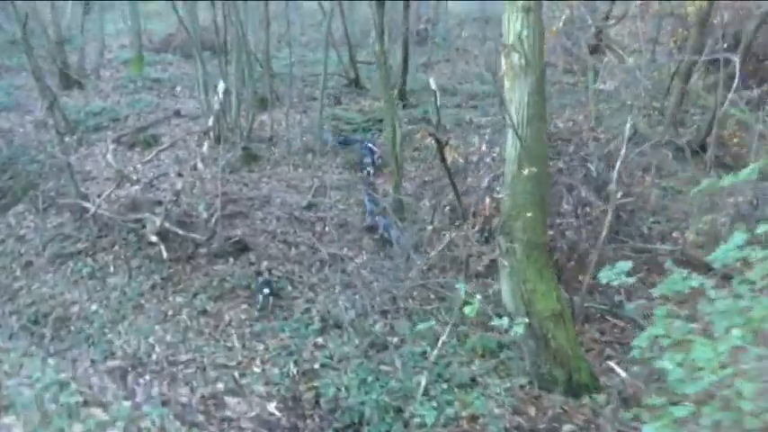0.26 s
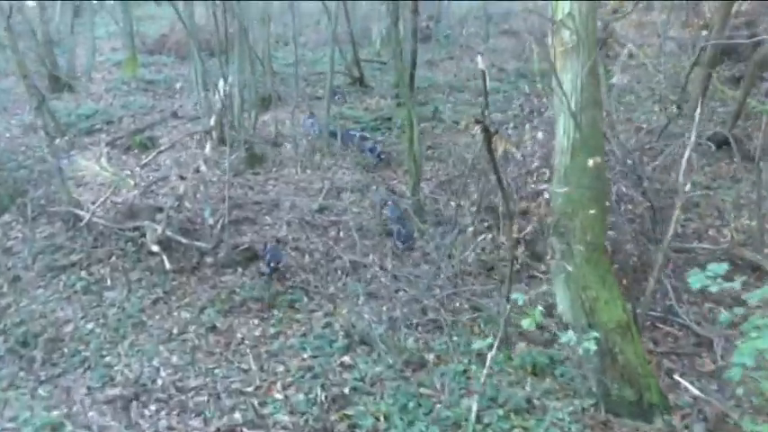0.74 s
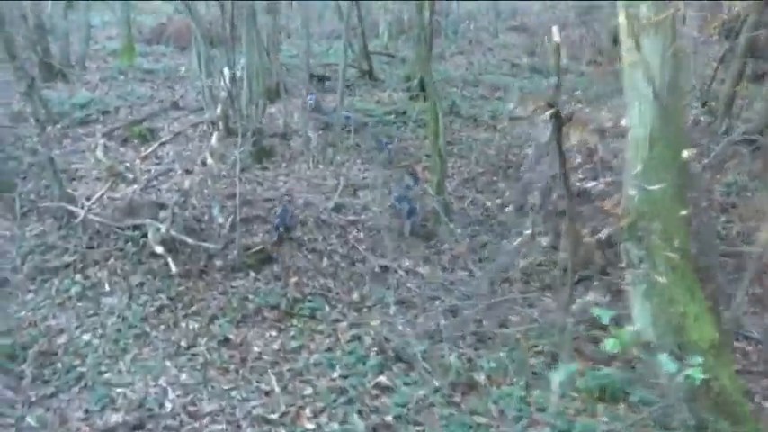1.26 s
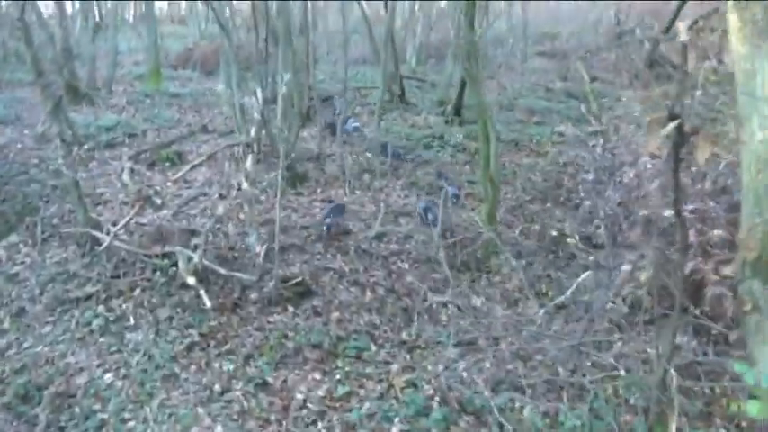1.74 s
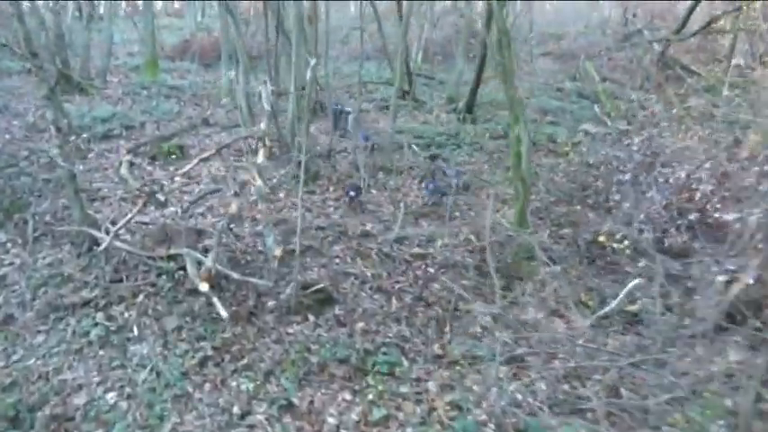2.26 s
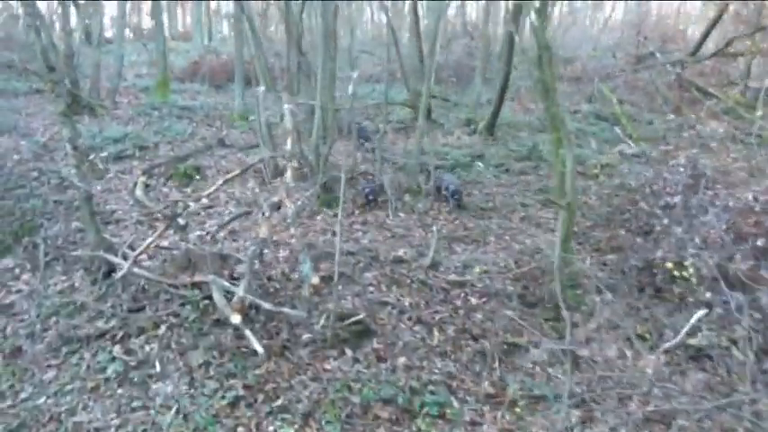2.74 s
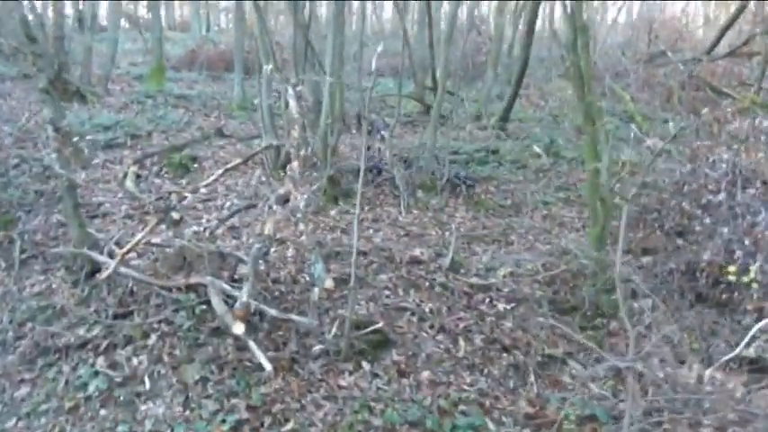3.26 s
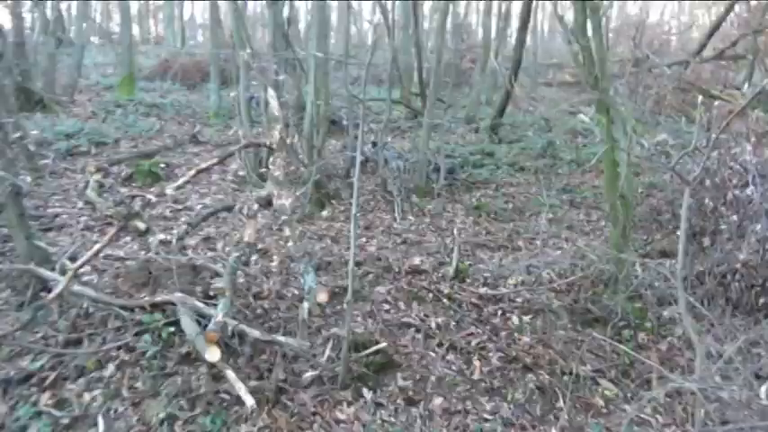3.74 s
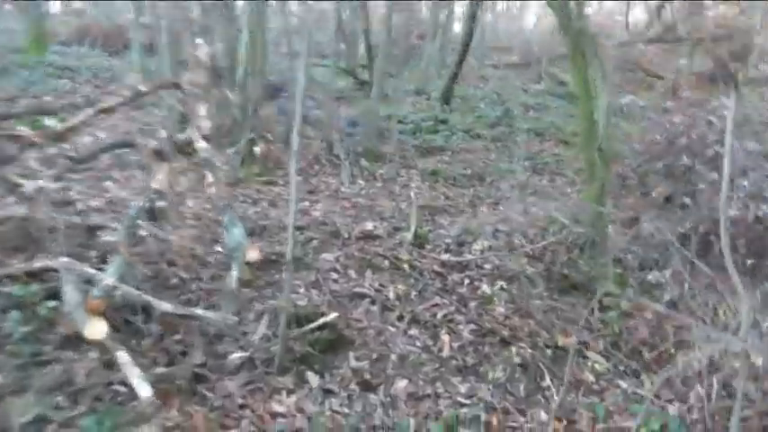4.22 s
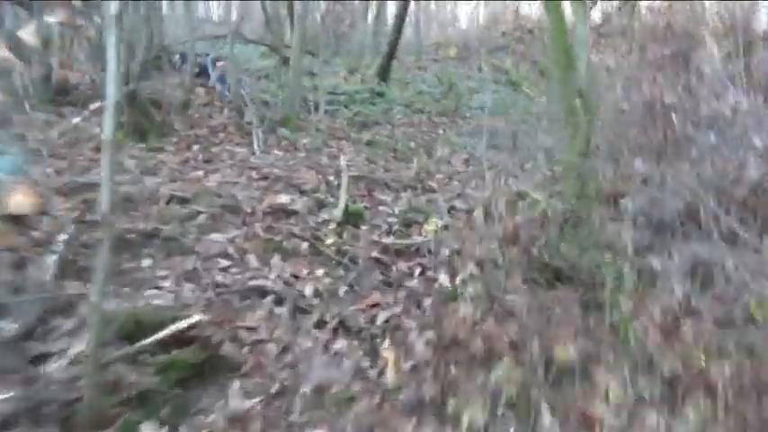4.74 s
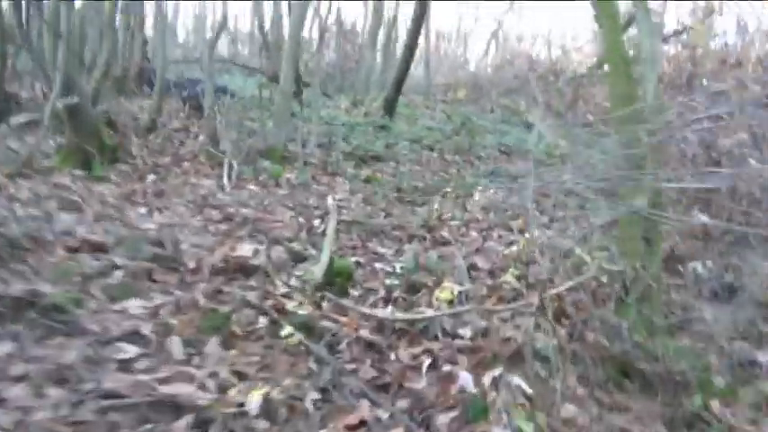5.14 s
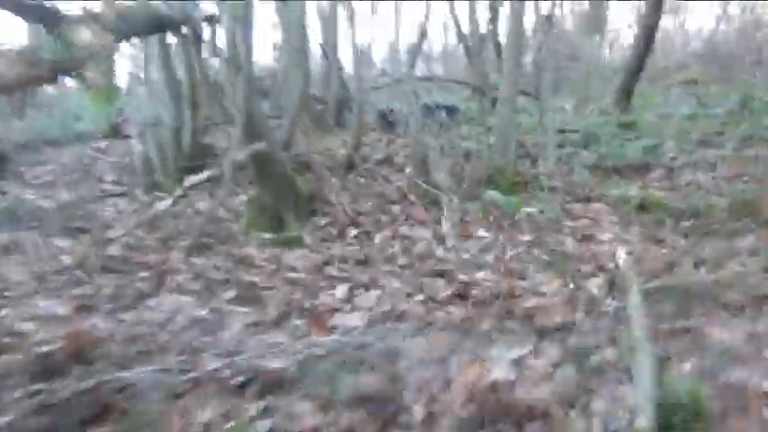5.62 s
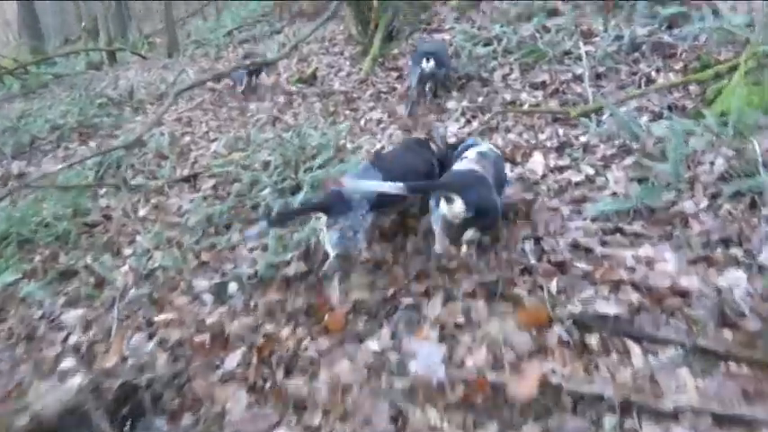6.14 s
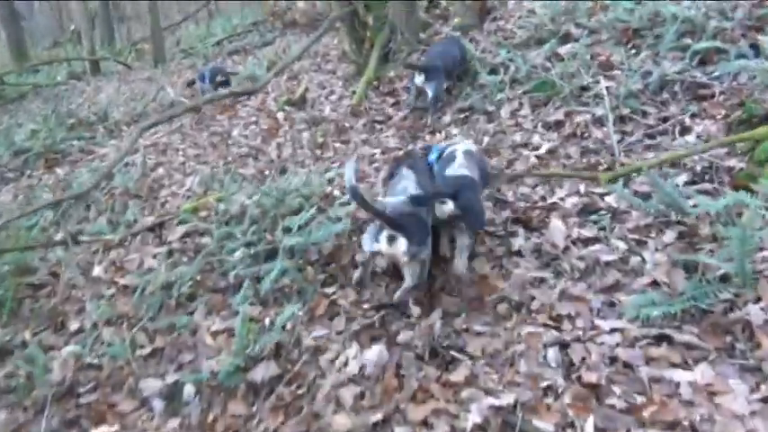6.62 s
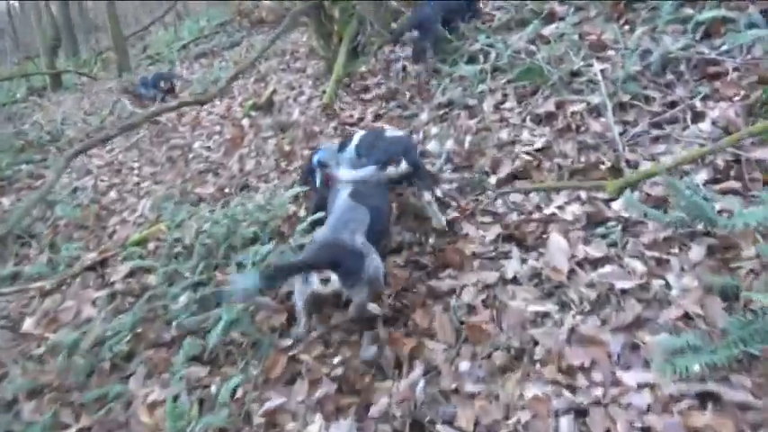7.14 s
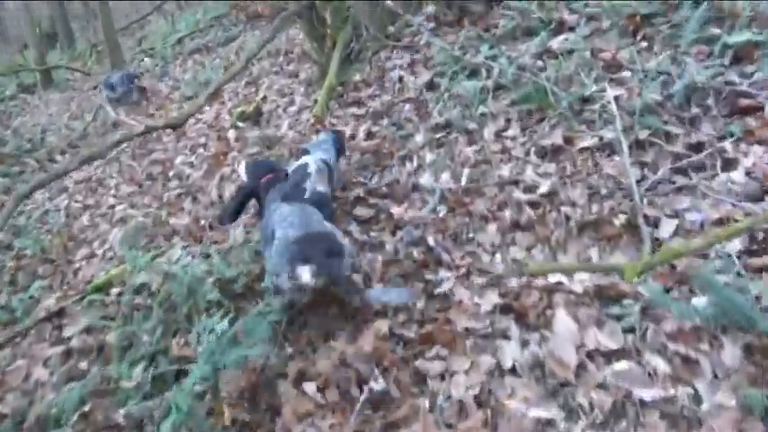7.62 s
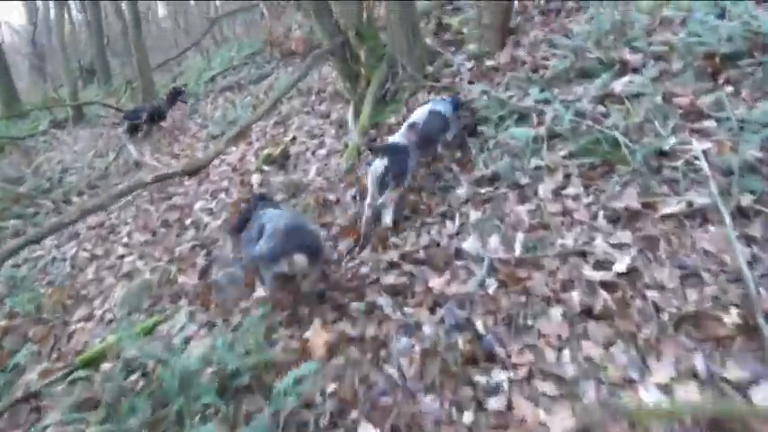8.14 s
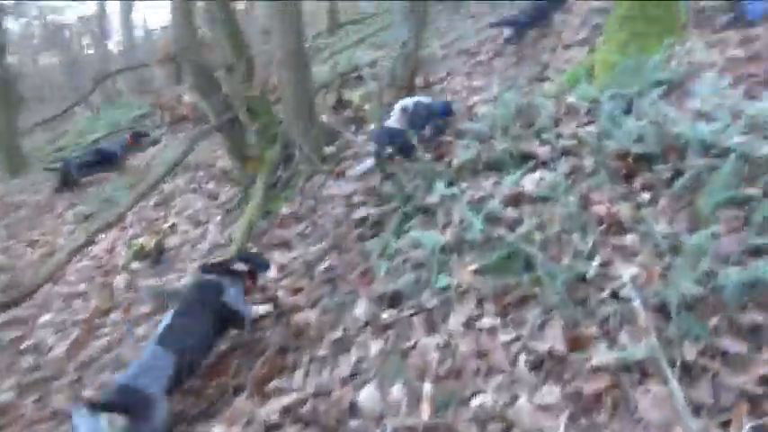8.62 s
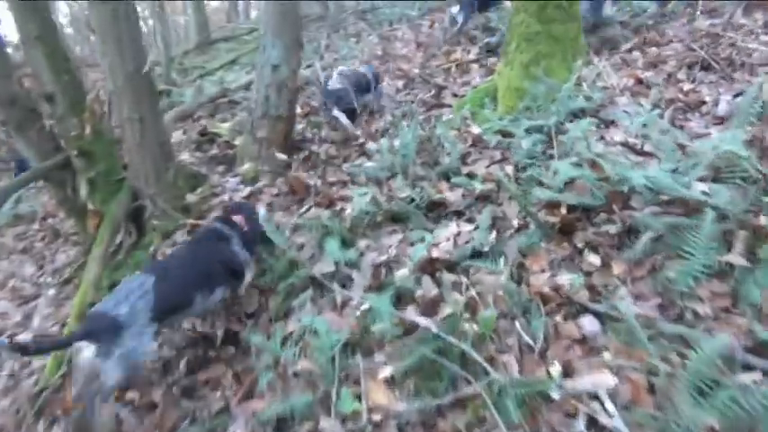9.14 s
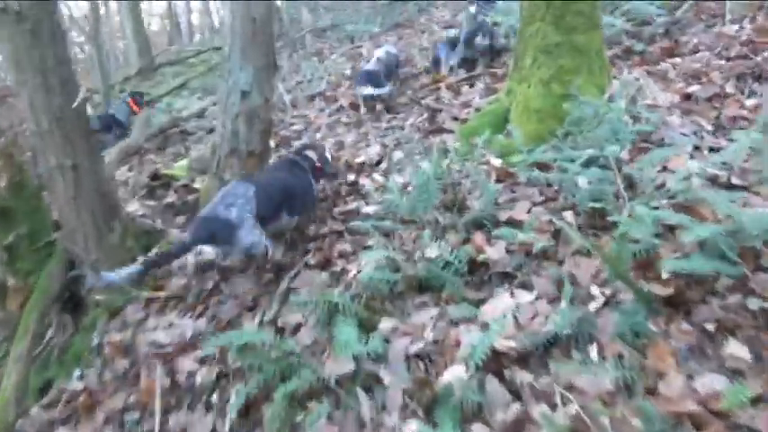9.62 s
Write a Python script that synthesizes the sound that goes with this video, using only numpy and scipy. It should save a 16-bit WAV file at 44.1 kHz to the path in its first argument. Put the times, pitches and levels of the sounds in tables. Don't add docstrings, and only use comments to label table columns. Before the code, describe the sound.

A pack of hounds bays in overlapping howls and hoarse barks in bare woodland, with crunching leaves, snapping twigs and faint collar bells.

```python
import sys
import numpy as np
from scipy import signal
from scipy.fft import rfft, irfft, next_fast_len
from scipy.io import wavfile
from scipy.ndimage import uniform_filter1d, minimum_filter1d, map_coordinates

SR = 44100
rng = np.random.default_rng(int(sys.argv[2]) if len(sys.argv) > 2 else 0)


def volts_from_db(level):
    exponent = np.asarray(level, float) / 20
    return 10 ** exponent


def master(y):
    cut = np.clip(np.atleast_2d(y).T, -1, 1)
    pcm = np.round(cut * 32767)
    wavfile.write(sys.argv[1], SR, pcm.astype(np.int16))


N = 435266
TIME = np.arange(N) / SR

# start [t/s], length [t/s], first pitch [f/Hz], last pitch [f/Hz], level [dB]
OPEN_BAYS = [(0.163, .11, 449, 472, -33.5), (0.196, 0.21, 388.4, 388.3, -23.5), (0.682, 0.2, 367, 349, -43),
             (0.969, 0.13, 357, 387.4, -30.5), (1.766, 0.061, 439, 441, -24.5),
             (2.878, 0.17, 461, 493, -32.5), (3.618, 0.18, 388, 377, -27), (3.811, 0.19, 450, 447, -34.5),
             (3.967, 0.084, 410, 416, -31), (4.42, 0.07, 385, 377, -30), (4.5, 0.36, 380, 359.7, -28),
             (7.296, 0.077, 375, 374, -22), (7.819, 0.046, 389, 372, -23.5), (7.927, 0.065, 395, 383, -25),
             (8.066, 0.11, 439, 454, -28.5), (9.091, .21, 495, 422, -31), (8.907, 0.175, 490, 537, -39),
             (8.68, 0.2, 470, 453, -32.5), (9.469, 0.094, 440, 507, -39), (9.621, 0.11, 500, 511.5, -40),
             (5.03, 0.026, 500, 484, -34), (7.662, 0.036, 505, 496, -26.5), (8.27, 0.11, 394, 393, -30),
             (0.431, 0.058, 384.4, 377, -28.5), (4.589, 0.053, 369, 377, -20.5)]
ROUND_BAYS = [(0, 0.22, 461.5, 419, -13), (0.399, 0.27, 396.3, 363, -26.5), (.95, 0.246, 470, 520, -28),
              (1.19, 0.096, 506.4, 463, -20.5), (1.912, .1, 633, 583, -21.5),
              (2.284, 0.26, 469, 459, -20.5), (3.378, 0.26, 424.2, 444.6, -18.5),
              (4.57, 0.11, 520.3, 521, -15.5), (4.68, 0.16, 515.5, 487, -20.5),
              (5.83, 0.059, 471.8, 470, -14), (7.366, 0.47, 408, 403.7, -13), (7.839, 0.15, 395, 399, -18),
              (7.99, 0.32, 404.3, 410, -13.5), (8.27, 0.091, 400, 391, -18.5),
              (8.345, 0.079, 421.3, 395, -16), (8.669, 0.15, 484.6, 429.8, -15),
              (8.721, 0.092, 460, 430, -14.5), (8.79, 0.166, 470, 490, -22.5),
              (9.553, 0.073, 426, 428, -18.5), (9.617, 0.15, 435, 399, -14.5),
              (9.65, 0.06, 470.4, 487, -14), (9.78, 0.15, 472, 455, -26)]
PURE_BAYS = [(.33, 0.19, 502.4, 501, -22), (.6, 0.17, 481, 486.7, -20.5), (.82, 0.24, 463, 470, -19.5),
             (1.522, 0.271, 442, 403, -18), (1.79, .12, 482, 502, -15.5), (2.04, 0.177, 470, 413, -18),
             (2.71, 0.267, 526, 482.5, -20.5), (2.951, 0.3156, 428, 494.4, -21),
             (3.26, 0.13, 485, 472, -16), (3.81, 0.16, 515.5, 503, -22.5),
             (3.926, 0.171, 434.4, 480.6, -23.5), (4.9, 0.137, 470, 489, -26), (5.0, 0.06, 518, 494.6, -17),
             (8.1, 0.098, 478, 534, -19), (8.682, 0.081, 383, 442, -17.5), (8.78, 0.127, 418, 404, -13.5),
             (8.876, 0.147, 402.3, 359.6, -21.5), (9.076, 0.098, 381, 403, -23.5),
             (9.317, 0.14, 417.4, 408.3, -9), (9.7, 0.037, 499, 506, -18), (.04, 0.036, 507, 528, -16),
             (.6, 0.021, 519, 522, -13), (9.198, 0.105, 435, 491, -12.5)]
HIGH_BAYS = [(1.101, 0.15, 594.5, 654, -18.5), (1.283, 0.061, 576, 570, -20), (1.378, .15, 658, 538, -14),
             (2.008, 0.14, 574.4, 559, -18), (2.227, 0.24, 517, 563, -17.5), (2.422, 0.118, 596, 585, -16),
             (2.555, 0.15, 591.4, 562.3, -10.5), (4.456, .12, 539.6, 603, -16),
             (4.399, 0.029, 461, 583, -27), (7.288, 0.01, 520, 564, -9), (7.524, .08, 720, 470, -18),
             (9.295, 0.04, 659, 705, -14), (9.48, 0.089, 512, 550, -24), (9.581, 0.06, 556, 467, -15.5),
             (8.724, 0.016, 616, 595, -24), (9.171, 0.023, 564, 520, -23)]
SHRILL_BAYS = [(0.191, .06, 1373, 1440, -30), (0.169, 0.074, 1790, 1900, -44.5),
               (0.362, 0.108, 1676, 1770, -34), (0.049, 0.028, 2020, 2080, -35),
               (0.861, 0.054, 1640, 1667, -24.5), (.97, 0.093, 1425, 1470, -37),
               (1.027, 0.092, 1240, 1223, -40), (1.339, 0.21, 1702, 1518, -30.5),
               (1.183, 0.039, 1650, 1677, -26), (1.92, 0.028, 1790, 1850, -27),
               (1.919, 0.027, 2030, 2020, -33), (1.93, .05, 850, 800, -21),
               (1.99, 0.072, 1715, 1660, -30.5), (2.092, .08, 1720, 1660, -31),
               (2.41, 0.061, 1080, 1194, -27), (2.42, 0.095, 1416, 1540, -31),
               (2.84, 0.054, 1390, 1390, -26), (3.201, 0.097, 1340, 1320, -33),
               (3.928, 0.091, 2000, 2150, -47), (3.44, 0.032, 640, 617, -19.5),
               (4.618, .045, 1330, 1350, -26), (4.69, .09, 1380, 1390, -31), (4.93, 0.098, 1130, 1207, -25),
               (7.519, 0.035, 1900, 1880, -31), (7.569, .035, 1790, 1750, -26),
               (7.67, 0.034, 1587, 1670, -32), (8.04, 0.019, 1750, 1770, -32),
               (8.064, 0.018, 2170, 2180, -30), (8.655, 0.024, 1457, 1430, -27),
               (8.782, .04, 1500, 1630, -25.5), (9.11, 0.056, 1500, 1460, -30),
               (9.211, 0.076, 1420, 1234, -35), (9.34, 0.074, 1150, 1170, -32.5),
               (9.36, 0.052, 2120, 2150, -42), (9.69, 0.1, 1497, 1510, -30),
               (5.898, 0.024, 1153, 1110, -26), (4.52, 0.068, 962, 900, -24)]
SECOND_PARTIAL_DB = [6, -13.5, -25, -18.5, -29]
# f [Hz], level [dB]
OVERTONES_DB = [(1000, -12), (1600, -24), (2400, -32.5)]
ATTACK_S, RELEASE_S = 0.025, 0.035
PITCH_ARCH, SWELL_DB = 0.012, 3

# start [t/s], length [t/s], fold beats [f/Hz], effort [level/dB]
HOARSE_BARKS = [(0, .15, 230.9, -27.5), (.42, .39, 249.8, -29), (0.837, 0.16, 276.4, -24),
                (1.004, 0.25, 210.6, -28), (1.287, 0.23, 299.7, -22.5), (1.538, 0.37, 219.3, -26.5),
                (1.903, 0.3, 281.8, -25), (2.195, 0.44, 294, -26.5), (2.709, 0.46, 232.2, -28),
                (3.15, 0.24, 243.5, -31.5), (3.385, 0.24, 217.1, -25.5), (3.625, 0.23, 192.6, -39.5),
                (3.817, 0.27, 217.5, -35), (4.45, 0.24, 190.5, -24.5), (4.602, 0.23, 128.1, -27),
                (4.969, 0.087, 125.5, -31), (5.883, 0.046, 235.5, -29.5), (7.362, 0.18, 201.4, -34),
                (7.498, 0.212, 248.9, -24), (7.711, 0.2, 205.7, -35), (8.002, 0.2, 274.6, -26.5),
                (8.375, 0.081, 209.8, -33.5), (8.658, 0.29, 230.7, -25), (8.941, 0.184, 187, -31),
                (9.069, 0.093, 240.5, -28), (9.161, 0.093, 234.7, -22.5), (9.268, .17, 225, -31),
                (9.557, 0.29, 247.4, -27.5)]
# start [t/s], length [t/s], fold beats [f/Hz], effort [level/dB], brightness [level/dB]
STEADY_YELPS = [
    (.15, 0.44, 234.4, -33.5, -37),
    (2.574, 0.1, 290, -28, -44),
    (4.835, 0.21, 116.5, -33, -44),
    (5.833, 0.072, 466.4, -37, -32),
    (7.283, 0.07, 365, -32, -33),
    (8.204, 0.073, 196.6, -42, -58),
]
# centre [f/Hz], width [f/Hz], level [dB]
THROAT_MODES = [(470, 104.4, 16.5), (950, 220, -1)]
JAW_MODES = [(1048, 102, 7), (1210, 344, -2.5)]
MOUTH_MODES = [(1527, 416, 11), (1651, 230, 13.5), (2130, 236, -3)]
BARK_ROUGH, YELP_ROUGH_PER_S = 0.16, 0.2
BRIGHT_DB, BRIGHT_DB_PER_DB = -27.5, 1.66
SAG, GROWL_HZ, GROWL_CHEST = 0.025, 150, 0.98
MOUTH_OPENS_S, MOUTH_SHUTS_S = 0.05, 0.1

# middle [t/s], half length [t/s], peak [level/dB]
LEAF_TREADS = [(.63, 0.059, -41), (1.12, 0.024, -28), (1.4, 0.12, -41.5), (1.75, 0.16, -46),
               (2.07, 0.089, -39), (2.5, 0.045, -66), (2.85, 0.11, -55.5), (3.5, 0.13, -55),
               (4.17, 0.25, -52.5), (4.42, 0.064, -33), (4.6, 0.074, -31), (4.89, 0.0094, -34),
               (5.03, 0.013, -48), (5.18, 0.019, -34.5), (5.31, 0.051, -28), (5.62, 0.069, -31.5),
               (5.88, 0.039, -35.5), (6.21, 0.13, -50), (6.46, 0.066, -39), (6.87, 0.065, -40.5),
               (7.19, 0.12, -33), (7.42, 0.022, -50), (7.68, 0.25, -41), (7.97, 0.047, -36.5),
               (8.14, 0.064, -37.5), (8.3, 0.11, -42), (8.57, 0.24, -50), (8.83, 0.19, -42),
               (9.11, 0.12, -37.5), (9.4, 0.07, -38.5)]
# f [Hz], level [dB per Hz]
LEAF_SPECTRUM = [(120, -27.5), (200, -0.5), (558, -6.5), (671, -7.5), (1400, -6), (2860, -6), (5840, -6.5),
                 (9930, 2.5), (16000, -10)]
# f [Hz], likeness [0-1]
LEAF_LIKENESS = [(300, 0.69), (2500, 0.87), (4500, 0.78), (9000, 0.84), (14000, 0.85)]
LITTER_DB, FAR_DB = -43, -59
DULL_GROWTH, CRISP_HZ = 0.65, 6500

# middle [t/s], half length [t/s], peak [level/dB]
HANDLING_THUDS = [(0, 0.25, -61), (.55, 0.091, -46), (1.04, 0.11, -45.5), (1.43, 0.065, -34.5),
                  (2.1, 0.71, -55.5), (2.75, 0.16, -53), (4.6, 0.24, -50), (5.2, .06, -51),
                  (5.6, 0.2, -49.5), (9.25, 0.063, -47.5), (9.72, 0.037, -45), (9.5, .6, -61)]
# f [Hz], level [dB per Hz]
RUMBLE_SPECTRUM = [(25, -5), (62, -15.5), (100, 0.5), (160, -5), (250, -16), (600, -59.5)]

# t [s], peak [level/dB]
TWIG_SNAPS = [(0.3046, -26), (.5531, -23.5), (.6459, -23), (1.076, -24), (1.1142, -26), (2.495, -20.5),
              (2.826, -27.5), (3.495, -24), (4.0861, -23), (4.8793, -29), (5.244, -23), (5.6805, -23.5),
              (6.427, -22), (7.411, -16), (8.116, -34), (8.296, -16.5), (8.97, -27.5), (9.1305, -15.5),
              (9.2993, -33), (3.472, -19.5), (3.75, -20), (4.7473, -20.5), (5.17, -18), (5.3848, -13),
              (5.606, -13), (5.655, -7.5), (5.696, -11.5), (5.7074, -9), (5.728, -9), (5.7547, -9),
              (5.738, -21), (5.877, -19), (5.89, -15), (6.191, -16), (6.7605, -25), (7.1438, -17.5),
              (8.545, -27.5), (9.56, -19), (9.701, -23)]
# f [Hz], level [dB per Hz]
SNAP_SPECTRUM = [(500, -16), (3000, -16), (6000, 0), (10000, 10.5), (16000, -3)]

BELL_STRIKES = {2745: [(6.195, -38), (6.427, -36), (6.7845, -40), (7.4709, -34), (7.6725, -32),
                (7.7952, -21), (8.5659, -27), (9.0488, -30), (9.5587, -33)], 2842: [(.5033, -25),
                (1.1603, -27), (1.2246, -31), (1.5738, -27), (1.9056, -34), (3.3847, -34), (3.6222, -34),
                (9.7009, -38)], 2929: [(2.2333, -34), (2.4433, -35), (2.9701, -34), (3.0914, -39),
                (4.2812, -38), (5.5069, -39), (5.7284, -39), (6.405, -37), (6.8887, -32), (7.7608, -31),
                (7.9369, -35), (8.0711, -29), (8.1978, -32), (8.759, -28), (8.972, -33), (9.1296, -29)]}
# f [Hz], level [dB], t60 [s]
BELL_MODES = [(7290, -10, .12), (9850, -13, .08), (13700, -18, .05), (12500, -6, .15)]

# start [t/s], length [t/s], first pitch [f/Hz], last pitch [f/Hz], level [dB]
CLEAR_CALLS = [
    (2.595, 0.091, 298, 283, -26.5),
    (5.835, 0.051, 471, 470, -24.5),
    (7.3, 0.045, 375, 373, -34),
    (8.65, .03, 450, 480, -32),
    (8.2, 0.15, 400, 392, -40.5),
    (1.915, .04, 204, 203, -32.5),
    (9.69, 0.071, 500, 505, -31.5),
    (9.58, .03, 410, 420, -33),
]
GROWLING_BAY = [
    (4.8, 0.153, 110.1, 117, -28),
    (4.95, 0.079, 117, 124.8, -29),
]
BRIEF_GRUNTS = [
    (9.47, .08, 407, 422, -21),
    (9.75, .04, 415, 340, -23),
    (2.8, .06, 480, 500, -18),
    (2.9, .05, 500, 480, -17),
    (3.17, .05, 580, 480, -17),
    (1.43, .07, 605, 545, -14),
    (.68, 0.044, 420, 490, -20),
    (4.04, 0.045, 481, 486, -23),
    (8.65, 0.051, 450, 470, -19),
    (7.315, 0.051, 372, 375, -15.5),
]
# f [Hz], level [dB]
OPEN_MOUTH = [(700, -39), (900, 0), (1450, -2.5), (1950, -7), (2350, -18), (2700, -44.5)]
GROWLING_THROAT = [(300, -32), (600, -14), (850, -1.5), (1100, -3), (1400, -15), (1700, -24), (2200, -38)]
SHUT_MOUTH = [(250, -20), (350, 0), (620, 0), (800, -15), (1300, -27), (2000, -54.5)]

# t [s], peak [level/dB], pitch [f/Hz]
WOOD_KNOCKS = [
    (4.339, -33.5, 255),
    (5.282, -33.5, 291),
    (5.642, -40.5, 398),
    (6.998, -34, 500),
    (7.147, -47, 334),
    (8.472, -39, 295),
]

# f [Hz], t60 [s]
TRUNK_T60 = [(300, 0.68), (550, 0.92), (1000, 0.58), (2000, 0.33), (10000, 0.51)]
# start [t/s], end [t/s]
DROPOUT_S = (5.775, 5.828)


def unit(x):
    return x / np.sqrt(np.mean(x ** 2) + 1e-20)


def along(points, hz):
    f, v = np.transpose(points)
    return np.interp(np.log(hz + 1), np.log(f + 1), v)


def wobble(rate_hz, size=N):
    knots = rng.standard_normal(int(size * rate_hz / SR) + 4)
    return map_coordinates(knots, [np.arange(size) * rate_hz / SR])


def swell(t, first, last, ramp_s):
    return np.clip(np.minimum(t - first, last - t) / ramp_s, 0, 1)


def humps(rows, floor_db):
    t = TIME[::32]
    rises = sum(volts_from_db(db) * np.exp(-((t - s) / half) ** 2) for s, half, db in rows)
    return np.interp(TIME, t, volts_from_db(floor_db) + rises)


def filtered(x, response):
    m = next_fast_len(N + SR // 2)
    return irfft(rfft(x, m) * response(np.fft.rfftfreq(m, 1 / SR)), m)[..., :N]


def spread(pair, spectrum, alike):
    def response(hz):
        turn = np.arccos(np.clip(along(alike, hz), -1, 1)) / 2
        return volts_from_db(along(spectrum, hz)) * [np.cos(turn), np.sin(turn)]
    mid, side = filtered(pair, response)
    return unit(np.array([mid + side, mid - side]))


def patchy(x, depth_db, tall, wide):
    z = signal.stft(x, nperseg=1024)[2]
    field = uniform_filter1d(rng.standard_normal(z.shape[-2:]), tall, axis=0)
    field = uniform_filter1d(field, wide, axis=1)
    gain = volts_from_db(depth_db * unit(field))
    return signal.istft(z * unit(gain), nperseg=1024)[1][..., :N]


def bays():
    out = np.zeros((2, N))
    voices = (OPEN_BAYS, ROUND_BAYS, PURE_BAYS, HIGH_BAYS, SHRILL_BAYS)
    calls = [(*row, up) for rows, up in zip(voices, SECOND_PARTIAL_DB) for row in rows]
    for s, length, from_hz, to_hz, db, second_db in calls:
        first, last = s - ATTACK_S / 2, s + length + RELEASE_S / 2
        a, b = max(round(first * SR), 0), min(round(last * SR), N)
        t, size = TIME[a:b], b - a
        u = np.clip((t - s) / length, 0, 1)
        arch = 4 * u * (1 - u) - 2 / 3
        hz = (from_hz + (to_hz - from_hz) * u) * (1 + PITCH_ARCH * arch)
        one_db = db + SWELL_DB * arch
        two_db = one_db + second_db
        drift, flutter = wobble(22, size), wobble(90, size)
        phase = 2 * np.pi * np.cumsum(hz * (1 + 0.008 * drift + 0.009 * flutter)) / SR
        voice = volts_from_db(one_db + 1.5 * wobble(35, size) + hz / 550 * flutter) * np.sin(phase)
        voice += volts_from_db(two_db + 2 * wobble(25, size) - 1.5 * flutter) * np.sin(2 * phase + 1)
        weaker_db = np.minimum(one_db, two_db)
        for k in range(3, 6):
            partial_db = weaker_db + along(OVERTONES_DB, k * hz) + 6 * wobble(30, size)
            voice += volts_from_db(partial_db) * np.sin(k * phase + k)
        side_db = rng.normal(0.45, 1.0)
        ramps = np.minimum((t - first) / ATTACK_S, (last - t) / RELEASE_S)
        edges = np.sin(np.pi / 2 * np.clip(ramps, 0, 1)) ** 2
        out[:, a:b] += np.sqrt(2) * edges * voice * volts_from_db([[side_db], [-side_db]])
    return out


def beats(hz, rough):
    size = len(hz)
    drift = 0.1217 * rough * wobble(39.92, size) + 0.15 * rough * wobble(10, size)
    drifting_hz = hz * np.clip(1 + drift, 0.3, 2)
    at = np.flatnonzero(np.diff(np.floor(np.cumsum(drifting_hz) / SR)))
    luck = rng.standard_normal((len(at), 2))
    at = np.clip(at + 0.39 * rough * luck[:, 0] * SR / hz[at], 0, size - 1).astype(int)
    closures = unit(np.bincount(at, volts_from_db(12 * rough * luck[:, 1]), size))
    breath = 0.8 * rough * rng.standard_normal(size)
    return unit(closures + breath)


def cavity(modes, low_hz):
    def response(f):
        peaks = 0
        for k, (centre, width, db) in enumerate(modes):
            peaks = peaks + (-1) ** k * volts_from_db(db) * 1j * f * width / (centre ** 2 - f * f + 1j * f * width)
        return peaks * (1j * f / (low_hz + 1j * f)) ** 6 / (1 + 1j * f / 3000) ** 6
    return response


def hoarse():
    source = np.zeros((3, N))
    rasps = [(s, length, hz, BARK_ROUGH, db, BRIGHT_DB + BRIGHT_DB_PER_DB * (db + 25))
             for s, length, hz, db in HOARSE_BARKS]
    rasps += [(s, length, hz, YELP_ROUGH_PER_S * length, *dbs) for s, length, hz, *dbs in STEADY_YELPS]
    for first, length, hz, rough, effort_db, bright_db in rasps:
        last = first + length
        a, b = max(round((first - 0.015) * SR), 0), min(round((last + 0.018) * SR), N)
        t = TIME[a:b]
        sag = np.sign(hz - GROWL_HZ) * np.linspace(SAG, -SAG, b - a)
        folds = beats(hz * (1 + sag), rough) * swell(t, first - 0.015, last + 0.023, 0.028)
        opening = (t - first) / MOUTH_OPENS_S
        shutting = (last - t) / min(MOUTH_SHUTS_S, length / 2)
        mouth = np.clip(np.minimum(opening, shutting) + 0.5, 0.35, 1)
        chest = (hz < 285 or rough > 0.1) * (GROWL_CHEST if hz < GROWL_HZ else 1)
        level = volts_from_db([[effort_db + 8.0], [effort_db], [bright_db]])
        source[:, a:b] += folds * level * [np.full_like(mouth, chest), np.sqrt(mouth), mouth]
    out, grid_hz = 0, np.linspace(0, SR / 2, num=4096)
    shapes = cavity(THROAT_MODES, 282), cavity(JAW_MODES, 663), cavity(MOUTH_MODES, 1130)
    for drive, shape in zip(source, shapes):
        out = out + filtered(drive, shape) / np.sqrt(np.mean(np.abs(shape(grid_hz)) ** 2))
    apart = patchy(np.pad(out, (40, 0))[:N], depth_db=9, tall=8, wide=20) * volts_from_db(-21)
    return patchy(out, depth_db=5.5, tall=4, wide=5) + [apart, -apart]


def leaves():
    clumps = volts_from_db(3 * wobble(30) + 4 * wobble(60))
    struck = rng.random((2, N)) < 0.012 * clumps
    crack_db = 3 * np.minimum(rng.exponential(size=(2, N)), 3)
    cracks = struck * rng.standard_normal((2, N)) * volts_from_db(crack_db)
    hiss = rng.standard_normal((2, N)) * volts_from_db(1.5 * wobble(12) + 2 * wobble(35) + 1.5 * wobble(70))
    crush = spread(unit(hiss) + 0.5 * unit(cracks), LEAF_SPECTRUM, LEAF_LIKENESS)
    weight = humps(LEAF_TREADS, LITTER_DB)
    dull = filtered(crush, lambda hz: 1 / (1 + (hz / CRISP_HZ) ** 4))
    dull_weight = volts_from_db(-38) * (weight / volts_from_db(-38)) ** DULL_GROWTH
    return volts_from_db([[1.2], [-0.3]]) * (weight * (crush - dull) + dull_weight * dull)


def rumble():
    lumps = volts_from_db(1.7 * wobble(6.6)) * rng.standard_normal((2, N))
    return humps(HANDLING_THUDS, FAR_DB) * spread(lumps, RUMBLE_SPECTRUM, [(30, 0.8), (300, 0.86)])


def twigs():
    out, t = np.zeros((2, N + SR)), np.arange(600) / SR
    for s, db in TWIG_SNAPS:
        burst = volts_from_db(db - 60 * t / 0.022) * rng.standard_normal((2, len(t)))
        out[:, round(s * SR):][:, :len(t)] += burst
    rms = np.sqrt(np.mean(out[0, :N] ** 2))
    return volts_from_db(-4.5) * rms * spread(out[:, :N], SNAP_SPECTRUM, [(1000, 0.33)])


def bells():
    out, t = np.zeros((2, N + SR)), np.arange(SR // 8) / SR
    damping = np.clip(t / 0.002, 0, 1) * np.clip((0.12 - t) / 0.09, 0, 1)
    clinks = rng.random((140, 3)) * [N / SR, 10, 250] + [0, -50, 2720]
    strikes = [(s, db, hz) for hz, rows in BELL_STRIKES.items() for s, db in rows]
    for s, db, hz in strikes + list(clinks):
        luck = np.clip(rng.standard_normal(6), -2, 1.2)
        note_hz = min(BELL_STRIKES, key=lambda bell: abs(bell - hz)) * (1 + 0.003 * luck[5])
        ring = volts_from_db(-60 * t / 0.12) * np.sin(2 * np.pi * note_hz * t)
        for k, (mode_hz, level_db, t60_s) in enumerate(BELL_MODES):
            tone = np.sin(2 * np.pi * mode_hz * (1 + 0.0032 * luck[k]) * t)
            ring += volts_from_db(level_db + 6.6 * luck[k] - 60 * t / t60_s) * tone
        sides = volts_from_db([[2.2 * luck[4]], [-2.5 * luck[4]]])
        out[:, round(s * SR):][:, :len(t)] += volts_from_db(db + 1.0) * damping * ring * sides
    return out[:, :N]


def stacks():
    out, k = np.zeros(N), np.arange(1, 19)[:, None]
    groups = (CLEAR_CALLS, OPEN_MOUTH), (GROWLING_BAY, GROWLING_THROAT), (BRIEF_GRUNTS, SHUT_MOUTH)
    for rows, mouth in groups:
        for s, length, from_hz, to_hz, db in rows:
            a, b = round((s - 0.012) * SR), round((s + length + 0.018) * SR)
            size = b - a
            hz = np.linspace(from_hz, to_hz, size) * (1 + 0.007 * wobble(40, size))
            waver_db = 4 * np.array([wobble(30, size) for _ in k])
            phase = k * (2 * np.pi * np.cumsum(hz) / SR + k / 4)
            partials = volts_from_db(db + along(mouth, k * hz) + waver_db) * np.sin(phase)
            out[a:b] += np.sqrt(2) * partials.sum(axis=0) * swell(TIME[a:b], TIME[a], TIME[b], 0.03)
    return out


def knocks():
    out, t = np.zeros(N + SR), np.arange(SR // 10) / SR
    for s, db, hz in WOOD_KNOCKS:
        ring = sum(np.sin(2 * np.pi * hz * ratio * t) for ratio in (0.7, 1, 1.35))
        out[round(s * SR):][:len(t)] += volts_from_db(db - 60 * t / 0.1) * ring * np.clip(t / 0.0017, 0, 1)
    return out[:N]


def wood(x):
    hz, t, z = signal.stft(rng.standard_normal((2, SR)), SR, nperseg=256)
    decay = volts_from_db(-60 * t / along(TRUNK_T60, hz)[:, None])
    tail = signal.istft(z * decay, SR, nperseg=256)[1]
    delayed = np.pad(x, (700, 0))[None]
    return signal.fftconvolve(delayed, tail / np.linalg.norm(tail[0]), axes=1)[:, :N]


def scene():
    near = bays() + hoarse() + bells() + knocks() + stacks()
    return near + volts_from_db(-18.5) * wood(near.mean(axis=0)) + leaves() + twigs() + rumble()


def top_cut(x):
    return signal.sosfilt(signal.butter(12, 16110, fs=SR, output="sos"), x)


def record(dry):
    needed = 0.95 / np.maximum(np.abs(dry).max(axis=0), 0.95)
    gain = uniform_filter1d(minimum_filter1d(needed, size=441), size=441)
    x = filtered(dry * gain, lambda hz: (hz < 16000) * 1j * hz / (45 + 1j * hz))
    mix = x * (1 - swell(TIME, *DROPOUT_S, 0.0026))
    return top_cut(mix)


dry = scene()
out = record(dry)
master(out)
```